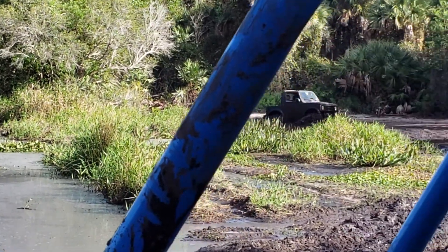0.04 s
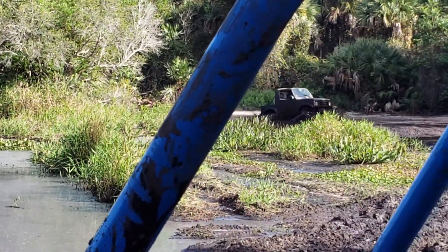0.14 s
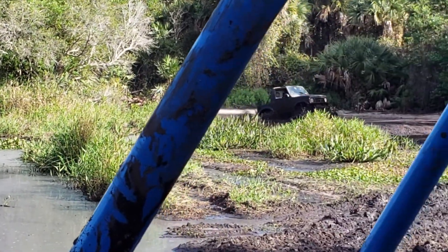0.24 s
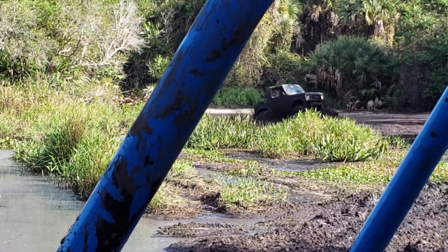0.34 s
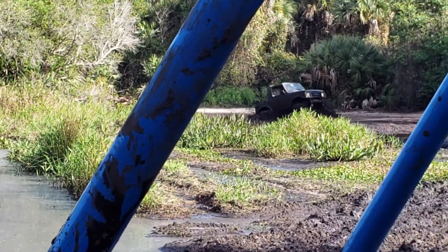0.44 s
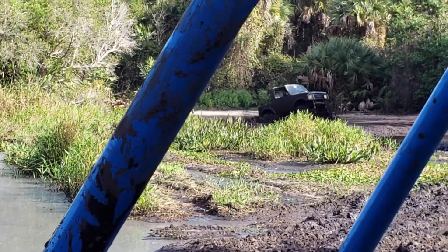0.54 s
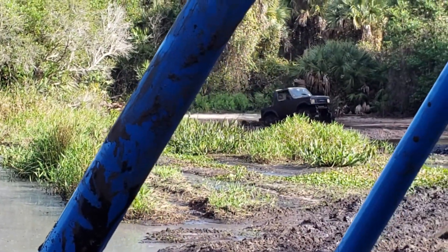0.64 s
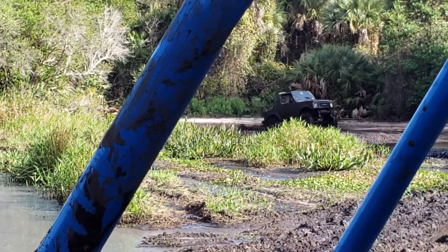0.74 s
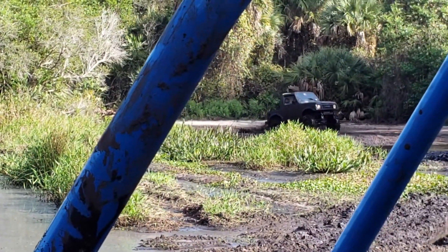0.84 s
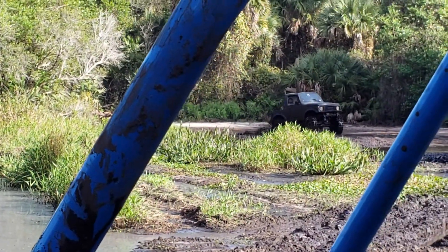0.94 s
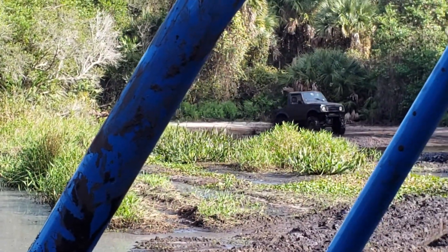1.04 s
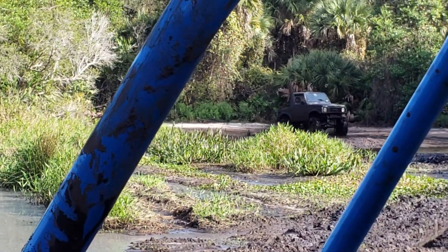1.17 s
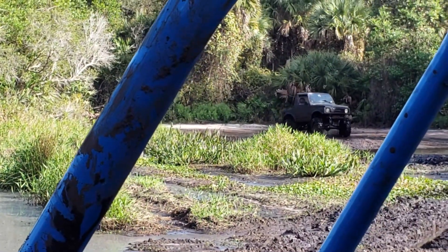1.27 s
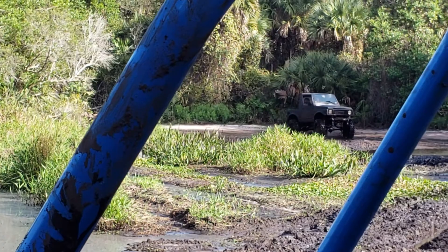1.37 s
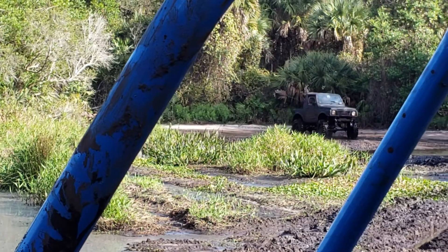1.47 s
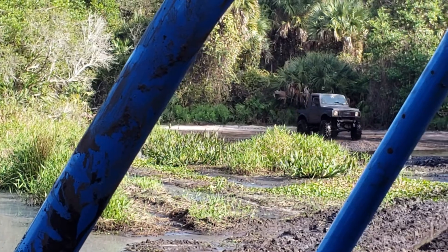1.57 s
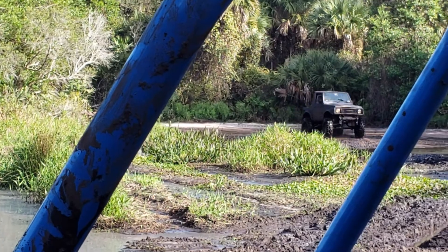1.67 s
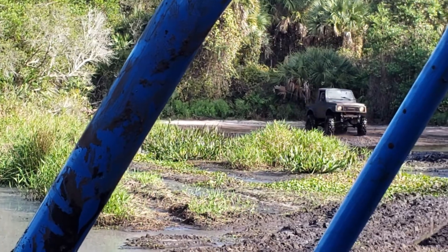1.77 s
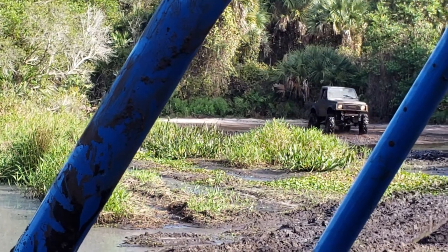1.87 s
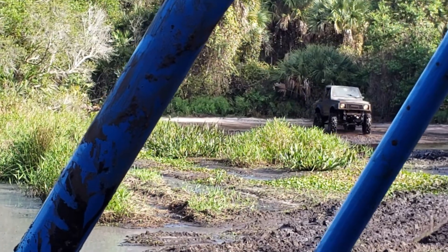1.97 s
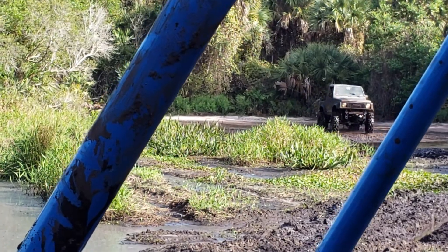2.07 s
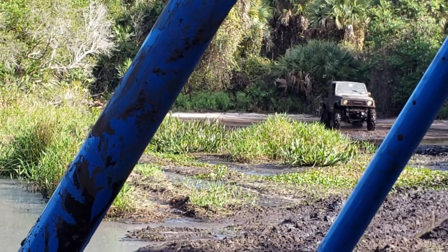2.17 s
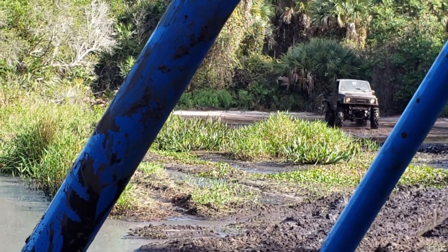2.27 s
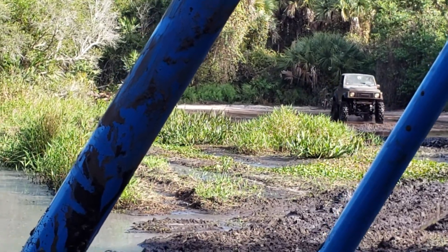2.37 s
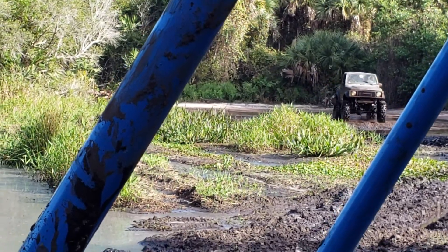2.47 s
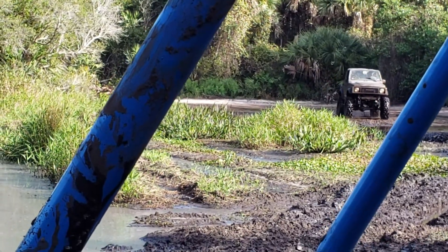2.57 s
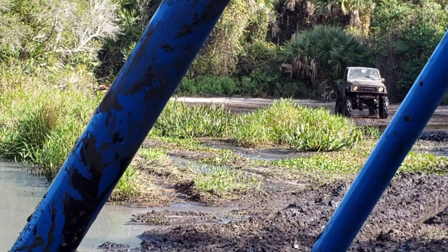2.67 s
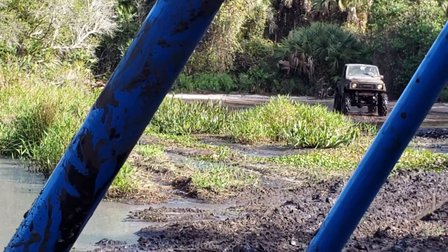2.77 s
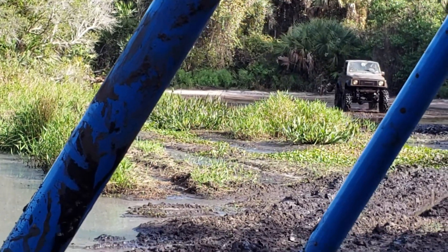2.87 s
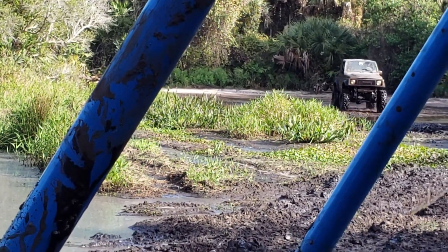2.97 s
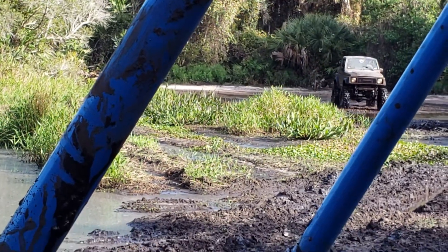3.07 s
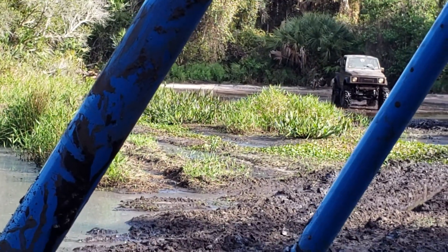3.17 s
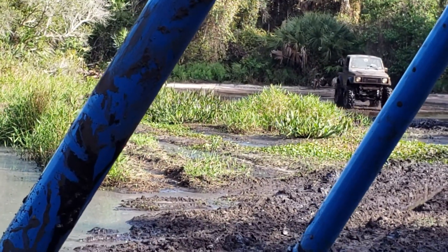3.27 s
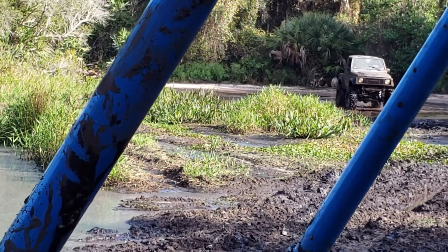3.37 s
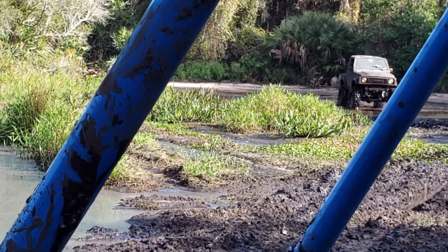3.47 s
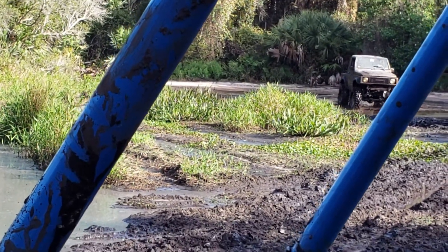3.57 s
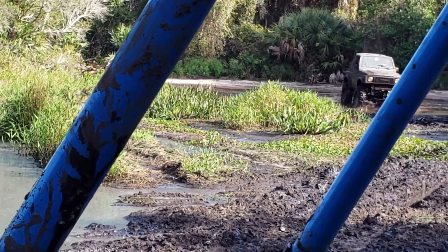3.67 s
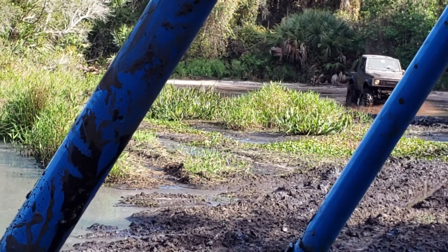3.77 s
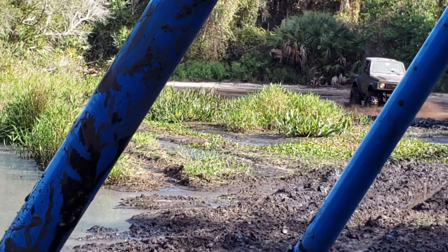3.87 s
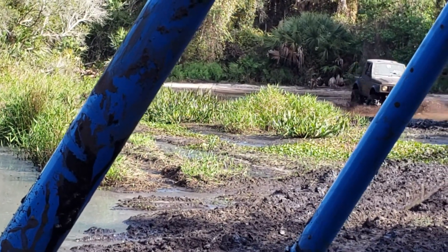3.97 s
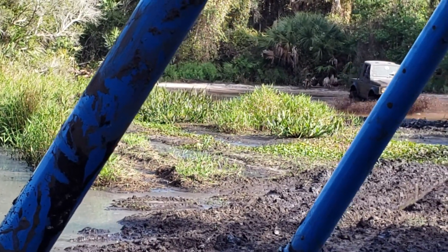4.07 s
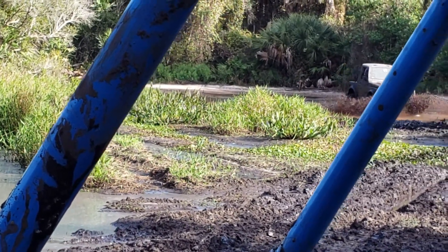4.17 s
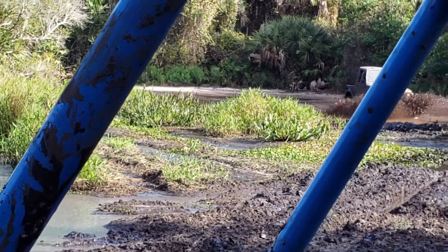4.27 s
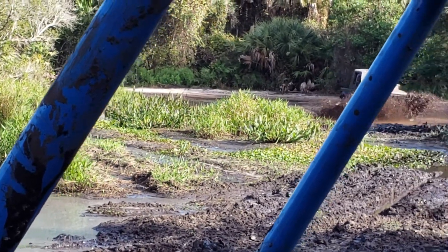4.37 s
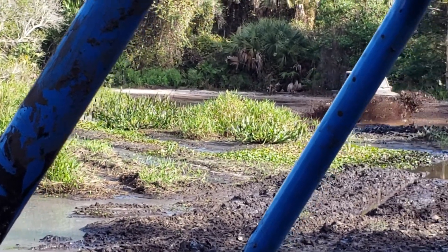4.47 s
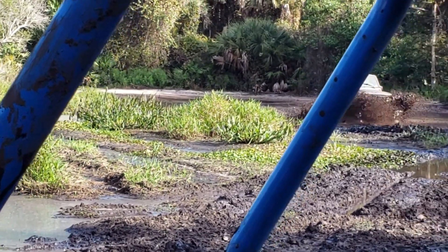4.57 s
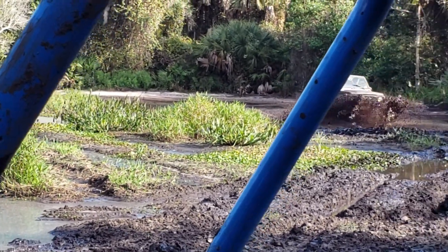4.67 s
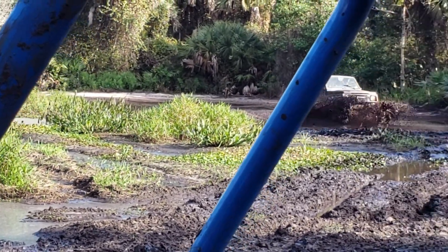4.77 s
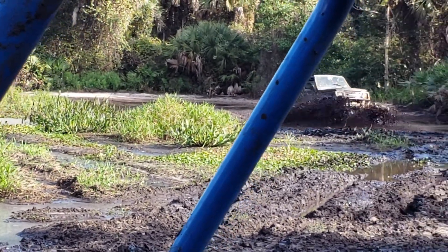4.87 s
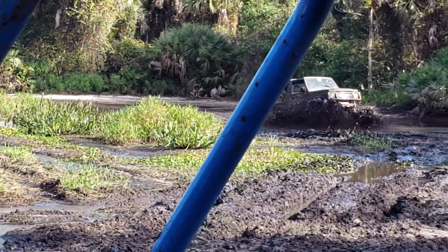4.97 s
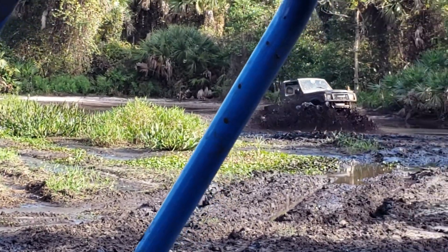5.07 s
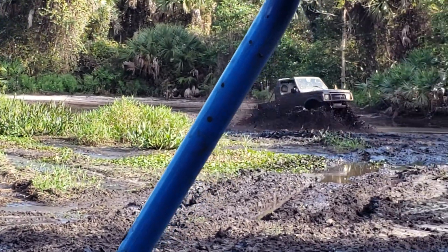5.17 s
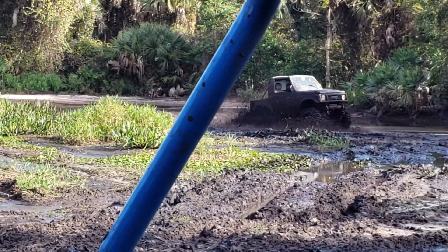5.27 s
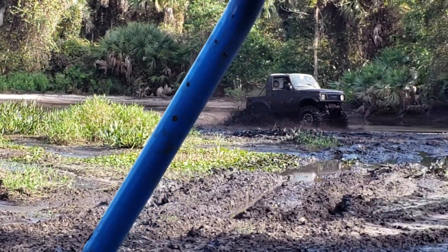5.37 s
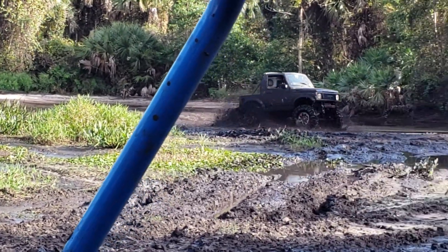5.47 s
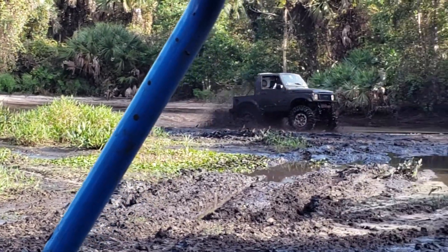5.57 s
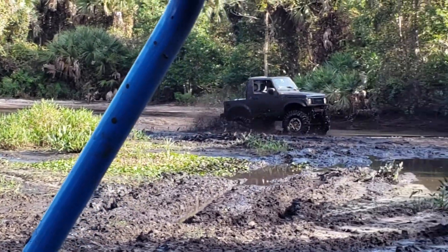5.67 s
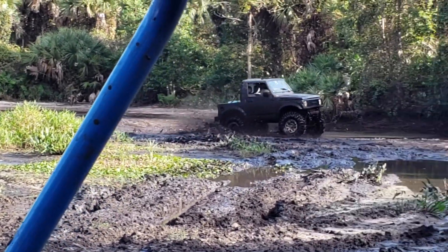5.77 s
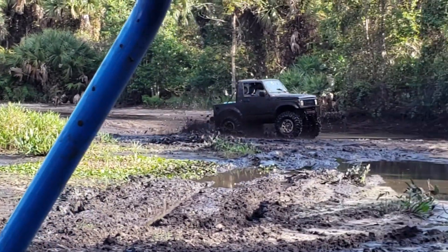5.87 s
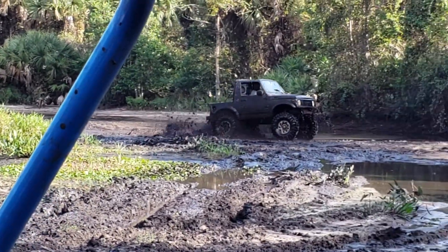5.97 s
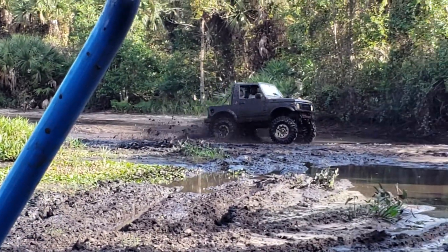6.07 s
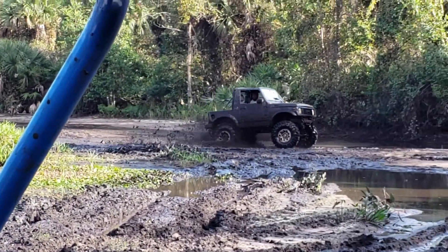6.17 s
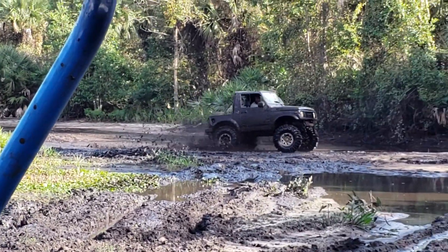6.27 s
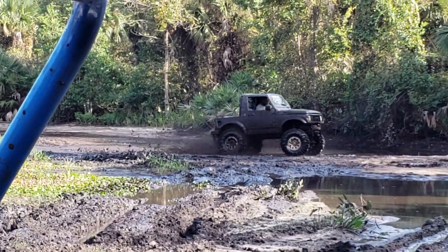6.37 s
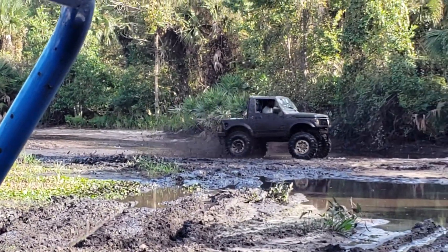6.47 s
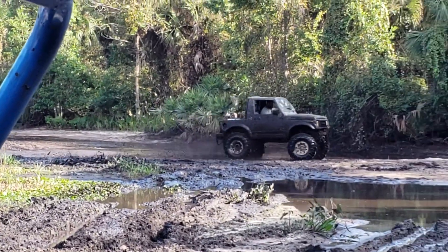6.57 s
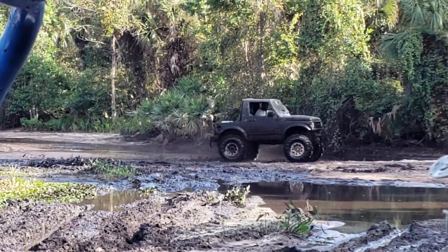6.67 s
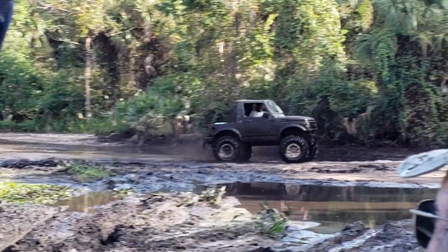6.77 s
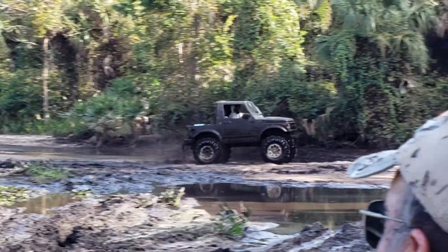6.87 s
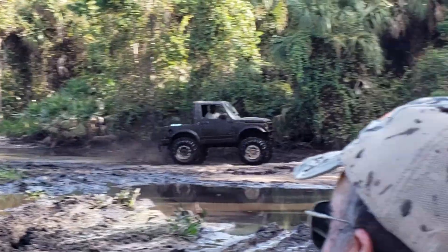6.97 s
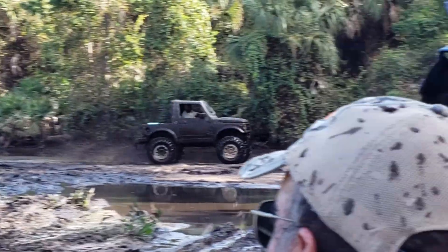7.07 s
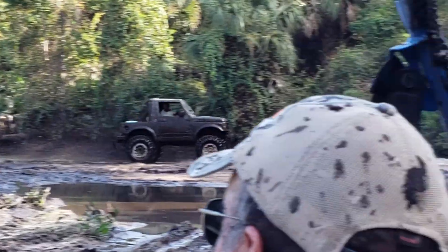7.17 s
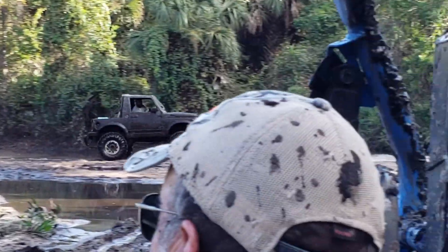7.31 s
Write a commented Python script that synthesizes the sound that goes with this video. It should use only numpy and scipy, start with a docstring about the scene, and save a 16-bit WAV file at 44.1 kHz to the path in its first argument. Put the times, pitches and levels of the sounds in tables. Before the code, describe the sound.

An off-roader's droning engine revs, eases off, then climbs in repeated surges and passes outdoors, with tyre roar and spattering mud.

```python
"""Off-roader in the mud

A small four-cylinder revs, lifts off, climbs and passes some way off. Its exhaust drones on multiples
of the firing rate, and turbulent gas puffs out with each firing. Intake and fan hiss under load, block
and tyres roar, flung mud spatters. The tree line answers, over outdoor air and a few low thumps."""
import sys
import numpy as np
from scipy import signal
from scipy.fft import rfft, irfft, next_fast_len
from scipy.io import wavfile
from scipy.ndimage import uniform_filter1d, map_coordinates

SR = 44100
rng = np.random.default_rng(int(sys.argv[2]) if len(sys.argv) > 2 else 0)


def dump_mix(stems):
    """Bounce the given channels to the path in sys.argv[1] as a 16-bit WAV at rate SR."""
    frames = np.atleast_2d(stems).T  # one column per channel
    limited = np.clip(frames, -1, 1)  # hard clip at full scale
    pcm = np.round(limited * 32767).astype(np.int16)
    wavfile.write(sys.argv[1], SR, pcm)


N = 323694


def amp(db):
    """Decibels to gain."""
    return 10 ** (np.asarray(db) / 20)


def unit(x):
    """Scale to rms 1."""
    return x / np.sqrt(np.mean(x ** 2) + 1e-20)


def along(points, hz):
    """Read (freq_hz, value) points on a log frequency axis."""
    freqs, values = np.transpose(points)
    return np.interp(np.log(hz + 1), np.log(freqs + 1), values)


def curves(rows):
    """One automation curve for each column after the time."""
    times, *columns = np.transpose(rows)
    return [np.interp(np.arange(N) / SR, times, column) for column in columns]


def wobble(rate, step=1):
    """Random drift, rate knots a second, read at every step-th sample."""
    knots = rng.standard_normal(1000).clip(-2, 2)
    return map_coordinates(knots, [np.arange(0, N, step) * rate / SR], order=1, mode="wrap")


def filtered(x, response):
    """EQ with a complex response of frequency."""
    size = next_fast_len(N + SR // 2)
    return irfft(rfft(x, size) * response(np.fft.rfftfreq(size, 1 / SR)), size)[..., :N]


def rush(spectrum, patchy_db, gate=1, centre_hz=None, peak_db=0, octaves=1):
    """Stereo noise of rms 1 with patches of random gain and an optional moving resonance."""
    # Stereo image: freq_hz, left_right_correlation
    likeness = [(60, .99), (300, .95), (700, .92), (1400, .64), (2400, .55), (4500, .66), (8000, .55),
                (12000, .3), (15000, .3)]
    hz, t, bins = signal.stft(rng.standard_normal((2, N)), SR, nperseg=512)
    patches = uniform_filter1d(rng.standard_normal(bins.shape[1:]), size=4, axis=0)
    gain_db = patchy_db * unit(uniform_filter1d(patches, size=10, axis=1))
    if centre_hz is not None:
        centre, peak_db = (np.interp(t, np.arange(N) / SR, curve) for curve in (centre_hz, peak_db))
        gain_db = gain_db + peak_db * np.exp(-(np.log2((hz[:, None] + 1) / centre) / octaves) ** 2)
    pair = gate * signal.istft(bins * amp(gain_db), nperseg=512)[1][:, :N]

    def mid_side(hz):
        spread = np.arccos(np.clip(along(likeness, hz), -1, 1)) / 2
        return amp(along(spectrum, hz)) * [np.cos(spread), np.sin(spread)]
    mid, side = filtered(pair, mid_side)
    return unit(np.array([mid + side, mid - side]))


def outdoors():
    """A steady bed of open air, mostly low rumble."""
    # Background colour: freq_hz, relative_db
    spectrum = [(12, -55), (20, -14), (43, -11), (79, -2.5), (116, -19.5), (228, -1.5), (301, -11.5),
                (367, -12.5), (558, -22), (660, -30), (1400, -27), (2020, -30), (4670, -33), (16000, -51)]
    return amp(-45) * rush(spectrum, patchy_db=-1.5)


def thumps():
    """Single low pushes of air, a little stronger on the left."""
    # Thumps: centre_s, relative_db, pitch_hz
    hits = [(.47, -48, 40.3), (1.6, -38, 40.7), (2.04, -44, 45), (2.17, -48, 48), (2.29, -39, 42.4),
            (2.621, -50, 35), (5.42, -43, 45), (7.03, -34, 80.5)]
    out, t = np.zeros((2, N + SR)), np.arange(SR // 8) / SR
    swell = np.exp(-((t - .03) / 0.015) ** 2)
    for centre_s, db, hz in hits:
        push = swell * np.sin(2 * np.pi * hz * t + rng.normal(0, 1.0, (2, 1)))
        start = round((centre_s - .03) * SR)
        out[:, start:start + len(t)] += amp(db + np.array([[7], [5]])) * push
    return out[:, :N]


def tree_line(drone):
    """The trees answer late; each frequency dies at its own speed."""
    # Echo decay: freq_hz, t60_s
    decay = [(80, 0.86), (500, 1), (3000, 0.88), (10000, 0.4)]
    hz, t, bins = signal.stft(rng.standard_normal((2, SR // 2)), SR, nperseg=1024)
    tail = signal.istft(bins * amp(-60 * t / along(decay, hz)[:, None]), SR, nperseg=1024)[1]
    tail[1] = 0.72 * tail[0] + 0.04 * tail[1]  # both sides hear nearly the same echoes
    delayed = np.pad(drone, (2500, 0))[None]
    return amp(-13) * signal.fftconvolve(delayed, tail / np.linalg.norm(tail[0]), axes=1)[:, :N]


def slapback(drone, delay_s=.11, cutoff_hz=300):
    """One dull echo, which beats against a falling note."""
    echo = np.pad(drone, (round(delay_s * SR), 0))[:N]
    return amp([[-13], [-15]]) * filtered(echo, lambda hz: 1 / (1 + (hz / cutoff_hz) ** 4))


def hiss_roar_spray(phase):
    """Intake hiss and block roar flutter with the firings, mud spatters; the nearer side leads."""
    # Load automation: time_s, hiss_db, hiss_centre_hz, hiss_focus_db, roar_db, spray_db
    load = [(0, -51.5, 4260, 8, -55.5, -61), (.42, -52, 4000, 11.5, -53, -62),
            (.8, -37.5, 5200, 9, -45, -54.5), (.98, -45.5, 4970, 20.5, -44, -54),
            (1.18, -38, 4950, 16, -43.5, -52), (1.27, -39, 5110, 12, -44.5, -45),
            (1.31, -45.5, 4570, 11.5, -50, -59), (1.39, -51.5, 4600, 12, -50, -63),
            (1.53, -57, 4560, 12, -54.5, -65.5), (2.21, -58, 4250, 9.5, -54, -64),
            (2.7, -56, 3930, 14, -56, -65), (2.86, -50, 3920, 17, -50, -60),
            (3.07, -43, 4180, 13.5, -48.5, -57), (3.4, -40.5, 4420, 13.5, -50, -54),
            (3.95, -42.5, 4360, 7.5, -46, -54), (4.42, -41, 4400, 8, -49.5, -52.5),
            (4.72, -46, 4510, 10, -50.5, -55), (5.01, -45, 4480, 8.5, -48, -52),
            (5.33, -36.5, 4780, 9, -45.5, -51), (5.58, -32, 5520, 11, -47, -44.5),
            (5.8, -29.5, 4800, 6.5, -43.5, -43.5), (5.93, -32, 5400, 8.5, -41, -44.5),
            (6.21, -28.5, 5430, 7.5, -41, -42.5), (6.45, -30.5, 4940, 8, -40, -46),
            (6.99, -31.5, 4830, 11, -34.5, -45.5), (7.05, -35.5, 4480, 8, -43, -52),
            (7.24, -48.5, 4260, 8.5, -50, -60), (7.34, -53, 4200, 11, -53.5, -62)]
    # Colours of intake, block with tyres, and flung mud and water: freq_hz, relative_db
    intake = [(1180, -20), (2000, -5.5), (2360, -2), (2730, -6), (3340, -5), (4700, -7.5), (5860, -6),
              (8010, -6), (10500, -18), (13600, -61), (22000, -120)]
    block = [(410, -35), (700, 3), (1060, 0), (1150, 0), (1790, -7.5), (1990, -8), (2390, -4), (2600, -7),
             (3380, -23), (5720, -120)]
    mud = [(5290, -35), (9000, -8), (10800, -2), (15100, 2), (16000, -16)]
    # Direction of the vehicle: time_s, left_lag_samples
    bearing = [(0, -0.99), (1.3, 0.16), (2, 0.15), (3.3, 0.61), (4.4, 0.26), (5.6, -1.625), (7.34, -1.5)]
    hiss_db, centre_hz, focus_db, roar_db, spray_db = curves(load)
    flutter = 1 + 0.079 * np.cos(phase) + 0.081 * np.cos(phase / 2)
    drops = amp(1.2 * rng.standard_normal(N // 32 + 1).repeat(32)[:N])
    hiss = rush(intake, patchy_db=1.93, gate=flutter, centre_hz=centre_hz, peak_db=focus_db, octaves=0.49)
    roar = amp(roar_db + 1.0 + 0.3 * wobble(18)) * rush(block, patchy_db=1.5, gate=flutter)
    spray = amp(spray_db + 0.6 * wobble(18)) * rush(mud, patchy_db=0.5, gate=drops)
    left, right = amp(hiss_db + 0.16 * wobble(24)) * hiss + roar + spray
    left = map_coordinates(left, [np.arange(N) - curves(bearing)[0]], order=5, mode="nearest")
    return np.array([left, right])


def exhaust_gas(phase, firing_db, upper_db):
    """Turbulent gas puffs out once per firing, following the strength of the pulses."""
    # Colours of the gas, low growl and higher rasp: freq_hz, relative_db
    growl_eq = [(24, -76), (40, -53), (80, -12.5), (123, -6.5), (162, -11), (391, -13), (450, -14),
                (580, -28), (990, -120)]
    rasp_eq = [(180, -38), (300, -35), (388, -2), (557, -8.5), (623, 2.5), (867, -19), (1020, -19),
               (1300, -51), (1690, -43), (2860, -120)]
    puff = 1 + 1.17 * np.cos(phase)
    growl = rush(growl_eq, patchy_db=1.2, gate=puff)
    rasp = rush(rasp_eq, patchy_db=1.5, gate=puff)
    return amp(firing_db - 19) * growl + amp(upper_db - 8) * rasp


def pulse_colour(firing_hz, firing_db):
    """Levels of harmonics 1-5, level and tilt of the higher ones: sharper pulses are brighter."""
    # Pulse sharpness: time_s, low_tilt_db_per_octave, upper_offset_db, upper_tilt_db_per_octave
    sharpness = [(0, -5.5, -18, -8), (.33, 1.3, -20, -8), (.48, -0.5, -26, -3), (.7, -4.5, -22, 7.5),
                 (.9, -7, -24.5, 4), (1.18, -2.5, -19, 9), (1.27, -7.5, -19, 9), (1.38, -7, -32, 5),
                 (1.55, -3, -20, 2.5), (2.5, -3, -26, 0.5), (3.3, -5, -24.5, 3), (4.23, -4.5, -18.5, -4),
                 (4.4, 2, -16.5, -2), (4.62, 2.5, -20.5, -5), (4.9, 0.9, -21.5, -13), (5.2, 2.5, -19.5, -8),
                 (5.45, -5.5, -24, -14), (5.66, -1, -15.5, -2), (5.9, -1, -18, 3), (6.2, -1.7, -8, 6.5),
                 (6.53, -1.1, -8, 5), (7, -0.5, -6.5, 13), (7.05, -4.5, -20, 1), (7.34, -10.5, -19, -5)]
    # Silencer colour on harmonics 2-5: freq_hz, gain_db
    silencer = [(130, -4.5), (160, -0.7), (190, -3), (225, 0.1), (260, -7), (295, -10.5), (325, -12.5),
                (350, -9.7), (385, -9), (430, -1), (480, -9.5), (560, -10), (700, -13)]
    # A harmonic dips as paths cancel or a firing stumbles: centre_s, harmonic, depth_db, half_width_s
    dips = [(0.09, 2, 6.5, 0.066), (0.23, 3, 15, 0.097), (0.25, 5, 19, 0.49), (0.29, 4, 10, 0.41),
            (0.47, 2, 17.5, 0.06), (0.47, 3, 21, 0.14), (0.91, 2, 27, 0.062), (0.94, 3, 17, 0.022),
            (0.95, 4, 27, 0.372), (1.148, 2, 7.5, 0.069), (1.3, 1, 27, 0.0087), (1.47, 1, 6, 0.012),
            (1.525, 1, 8, 0.012), (1.56, 2, 13, 0.12), (2.17, 1, 4, 0.015), (2.212, 2, -0.5, 0.331),
            (2.3, 1, 7, 0.013), (2.68, 4, 19, 0.117), (2.99, 3, 3.5, 0.149), (3.27, 5, 18, 0.27),
            (3.73, 3, 28, 0.053), (4.17, 3, 8, 0.098), (4.21, 4, 9, 0.31), (4.25, 2, 8, 0.094),
            (4.63, 2, 12.5, 0.3), (4.78, 4, 17, 0.47), (4.85, 5, 27.5, 0.78), (4.88, 1, 9, 0.02),
            (4.96, 3, 9, 0.13), (5.13, 2, 12, 0.22), (5.3, 3, 20.5, 0.048), (5.34, 4, 11, 0.16),
            (5.71, 4, 15.5, 0.32), (5.75, 3, 3.5, 0.282), (6.089, 3, 21, 0.058), (6.215, 1, 6, 0.02),
            (6.28, 2, 5, 0.048), (6.55, 3, 6, 0.053), (6.55, 5, 21, 0.035), (6.82, 4, 18, 0.041),
            (6.91, 5, 29, 0.124), (6.94, 2, 14.5, 0.059), (7.025, 1, 10, 0.0084), (7.05, 3, 10.5, 0.13),
            (7.1, 4, 8, 0.11), (7.135, 1, 4, 0.012), (7.175, 1, 9, 0.011), (7.23, 1, 4, 0.012)]
    t = np.arange(N) / SR
    low_tilt, upper_offset_db, upper_tilt = curves(sharpness)
    low_db = [firing_db.copy()]
    low_db += [firing_db + low_tilt * np.log2(k) + along(silencer, k * firing_hz) for k in range(2, 6)]
    for centre, k, depth_db, width in dips:
        near = slice(max(round((centre - 4 * width) * SR), 0), round((centre + 4 * width) * SR))
        low_db[round(k) - 1][near] -= depth_db * np.exp(-((t[near] - centre) / width) ** 2)
    return low_db, firing_db + upper_offset_db, upper_tilt


def exhaust_drone(firing_hz, phase, low_db, upper_db, tilt):
    """Firing pulses as multiples of the firing rate; each drifts and fades as paths interfere."""
    # Pipe and ground colour on the upper tones: freq_hz, gain_db
    pipe = [(180, -41), (300, -42), (312, -2), (330, 5), (377, -15), (414, -8), (449, -10), (487, -11),
            (651, -10), (852, -26.5), (975, -28), (1160, -37.5), (1500, -47), (1950, -58), (3300, -120)]
    # Unequal cylinders' tone at 1.5 times the firing rate: freq_hz, offset_from_firing_tone_db
    uneven = [(100, -7), (125, -29), (140, -22), (165, -18.5), (185, -11), (200, -15.5), (215, -22.5)]
    step = 8  # the tones lie low, so every 8th sample is enough
    firing_hz, phase, upper_db, tilt = [curve[::step] for curve in (firing_hz, phase, upper_db, tilt)]
    low_db = [curve[::step] for curve in low_db]
    jitter = 0.022 * wobble(40, step)  # firings come a little early or late

    def tone(k, db, fade_db):
        scatter = .4 if k in (1, 2) else 1.1 if k in (3, 4, 5) else 3
        start = np.pi + rng.normal(0, scatter)  # low harmonics line up into a steep front
        blur = 0.014 * k ** 1.5 * wobble(26, step)
        gain = np.sqrt(2) * amp(db + fade_db * wobble(7, step))
        return gain * np.sin(k * (phase + jitter) + blur + start)

    def pipe_tone(k, offset_db, fade_db=3.5):
        return tone(k, upper_db + offset_db + along(pipe, k * firing_hz), fade_db)
    low = sum(tone(k, db, fade_db=0.8) for k, db in enumerate(low_db, 1))
    upper = sum(pipe_tone(k, 3 + tilt * np.log2(k / 5), fade_db=4) for k in range(6, 12))
    # Unequal cylinders repeat every two and four firings: tones at halves and quarters.
    half_db = low_db[0] + along(uneven, 3 / 2 * firing_hz)
    halves = tone(3 / 2, half_db, fade_db=0.23) + tone(5 / 2, half_db - 13.5, fade_db=3.6)
    halves += sum(pipe_tone(k + 1 / 2, -11) for k in range(3, 9))
    quarters = tone(19 / 4, upper_db - 8, fade_db=3.5)
    quarters += sum(pipe_tone(k / 4, -20) for k in (9, 11, 11, 15, 13, 11))
    return signal.resample_poly(low + upper + halves + quarters, step, 1)[:N]


def scene():
    """One firing rate drives the engine layers; echoes, thumps and open air surround them."""
    # Engine speed: time_s, firing_hz
    speed = [(0.0, 90.4), (0.12, 90.6), (0.22, 93.3), (0.33, 92.0), (0.47, 97.0), (0.57, 89.0),
             (0.71, 87.0), (0.88, 85.4), (1.02, 89.0), (1.16, 90.3), (1.29, 98.4), (1.39, 83.6),
             (1.49, 67.3), (1.61, 68.4), (1.9, 76.5), (2.08, 74.7), (2.53, 74.2), (2.82, 79.5), (3.1, 83.8),
             (3.33, 87.4), (3.47, 92.0), (3.74, 97.6), (3.93, 92.0), (4.23, 98.6), (4.35, 108.8),
             (4.66, 115.6), (4.8, 118.3), (4.89, 124.0), (5.03, 118.5), (5.11, 114.9), (5.21, 106.9),
             (5.4, 91.6), (5.52, 93.4), (5.64, 101.0), (5.89, 113.0), (6.01, 114.6), (6.15, 116.1),
             (6.27, 128.6), (6.36, 132.0), (6.53, 116.0), (6.71, 130.0), (6.81, 138.2), (6.91, 141.3),
             (7.01, 142.3), (7.09, 119.0), (7.18, 114.5), (7.28, 104.2), (7.34, 104.3)]
    # Firing tone's swell with throttle and distance: time_s, level_db
    loudness = [(0.0, -27.5), (0.33, -27.5), (0.47, -18), (0.57, -22.5), (0.71, -20.5), (1.02, -21),
                (1.29, -24), (1.39, -31.5), (1.49, -39), (2.53, -36), (2.82, -34.0), (3.1, -28.5),
                (3.74, -27.5), (3.93, -30.5), (4.35, -24), (4.66, -19.5), (5.03, -21), (5.11, -20),
                (5.21, -16.5), (5.52, -16), (6.15, -16), (6.36, -14.5), (6.53, -18), (6.91, -15),
                (7.01, -15.5), (7.09, -21.5), (7.34, -27)]
    (firing_hz,), (firing_db,) = curves(speed), curves(loudness)
    low_db, upper_db, tilt = pulse_colour(firing_hz, firing_db)
    phase = 2 * np.pi * np.cumsum(firing_hz) / SR
    drone = exhaust_drone(firing_hz, phase, low_db, upper_db, tilt)
    echoes = slapback(drone) + tree_line(drone)
    engine = drone + exhaust_gas(phase, firing_db, upper_db) + hiss_roar_spray(phase)
    return engine + echoes + thumps() + outdoors()


def record(dry):
    """The microphone's surroundings colour the sound, its two ports differ, the top treble is cut."""
    # Narrow resonances around the microphone: centre_hz, width_hz, gain_db
    resonances = [(954, 27, 1), (1566, 160, 3.5), (1790, 65, 4.5), (2400, 30, 3), (3010, 183, 6),
                  (3660, 134, 4.5), (4220, 180, 2.5), (4690, 95, 5), (5170, 70, 2), (5700, 120, -0.5),
                  (6520, 50, 1.5), (7770, 110, 3)]
    # Port balance: freq_hz, left_minus_right_db
    lean = [(30, -0.5), (200, 1.3), (700, 3.5), (1400, 5), (2100, 2.5), (3400, 0), (4800, -4), (5600, -10),
            (6900, 1.5), (7600, -2), (8900, -7), (11000, -4.5), (12400, -5.5), (14500, 1)]
    # Port phase: freq_hz, left_lead_rad
    lead = [(300, 0.12), (1400, -0.75), (2100, -1), (3400, -1.46), (5500, -1.4), (6900, -0.3), (8300, -2),
            (10300, 0), (11700, -0.5), (14500, -0.8)]
    sides, top_hz = np.array([[.5], [-.5]]), 15790

    def response(hz):
        body_db = sum(db * np.exp(-((hz - centre) / width) ** 2) for centre, width, db in resonances)
        ports = amp(sides * along(lean, hz)) * np.exp(1j * sides * along(lead, hz))
        return amp(body_db) * ports * (hz < top_hz)
    return filtered(dry, response)


dry = scene()
out = record(dry)
dump_mix(out)
```